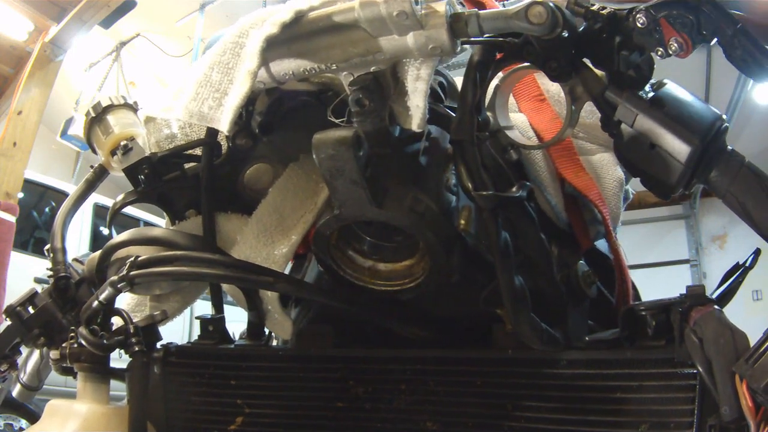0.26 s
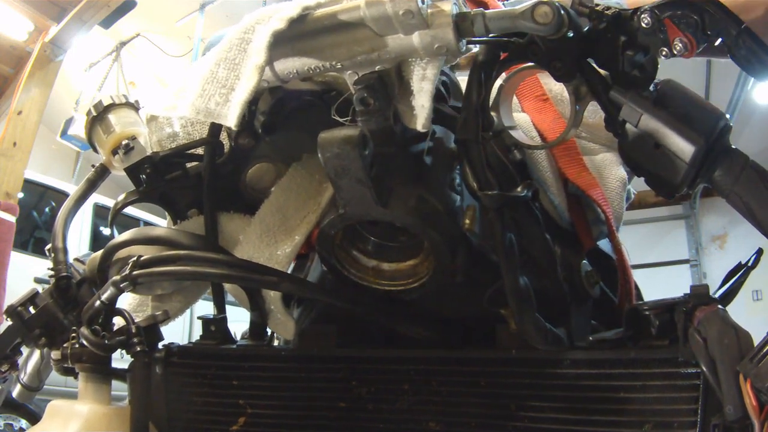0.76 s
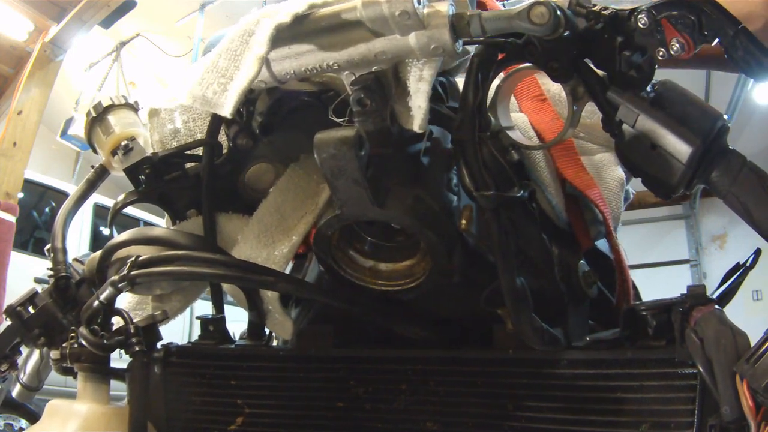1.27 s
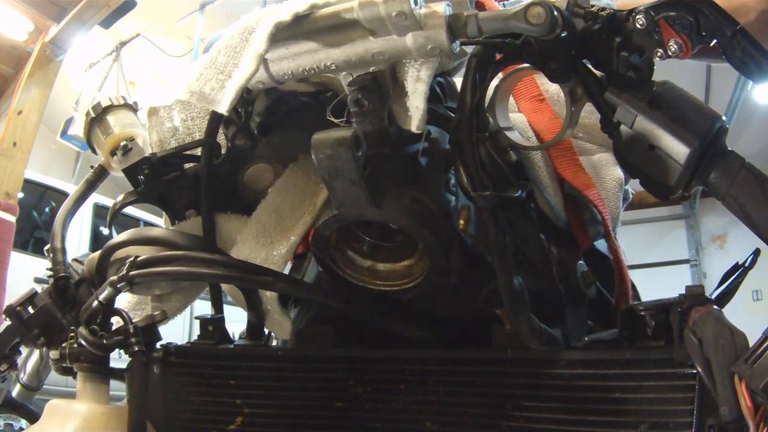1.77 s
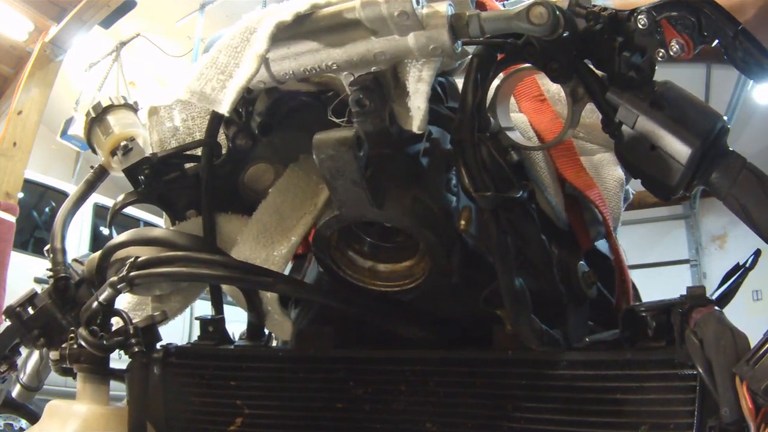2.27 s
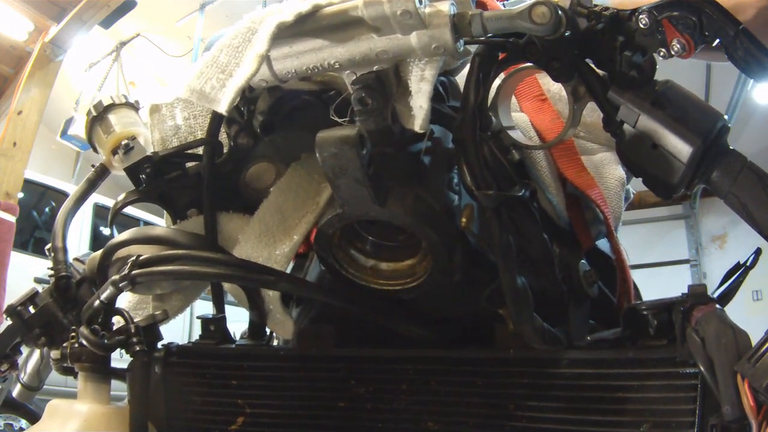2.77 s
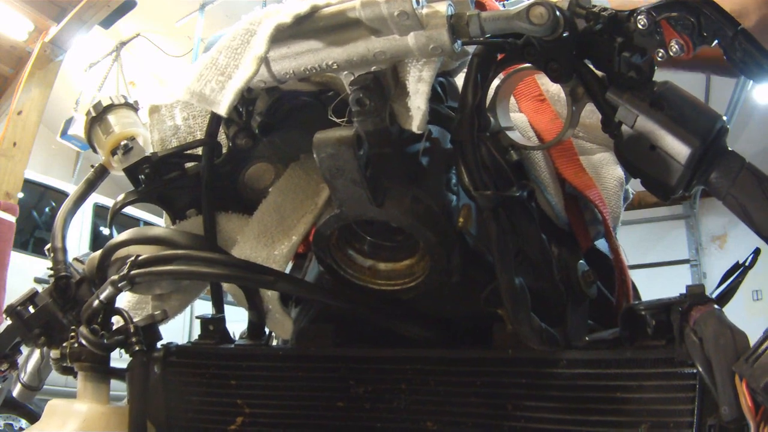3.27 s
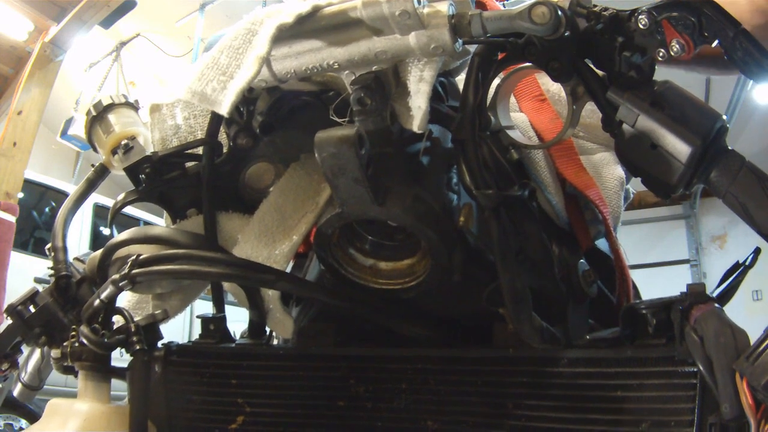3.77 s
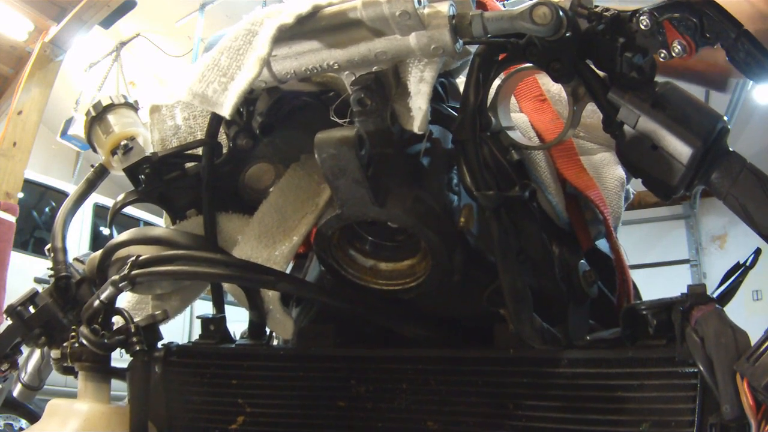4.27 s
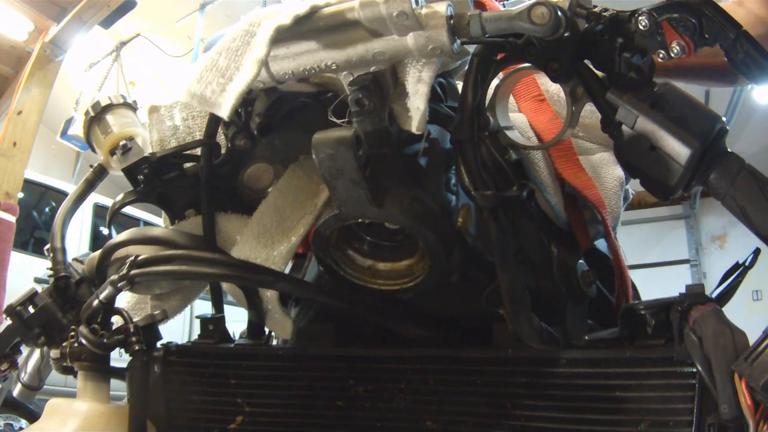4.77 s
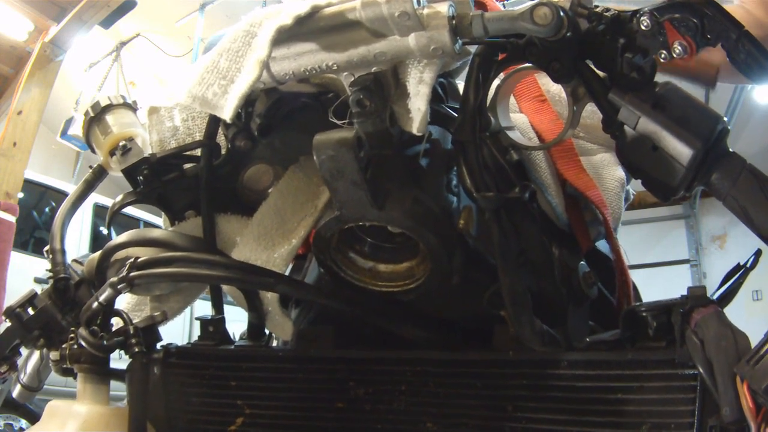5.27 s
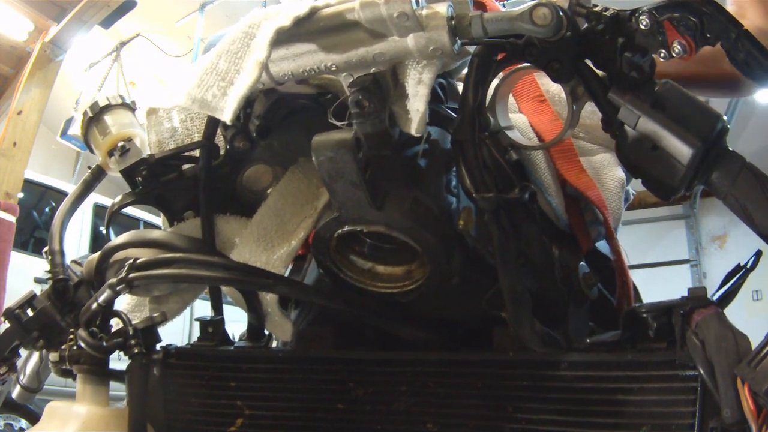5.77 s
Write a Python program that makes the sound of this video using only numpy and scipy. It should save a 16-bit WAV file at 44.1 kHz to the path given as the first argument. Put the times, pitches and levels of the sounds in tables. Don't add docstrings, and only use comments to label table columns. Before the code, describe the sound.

In a quiet garage, faint hiss and a dull stir of tools surround three soft contacts, each louder than the last. Then a hammer hits a steel punch hard, about three times a second, until the end. Every blow is a dense midrange knock with a brief bright tick, a thump as the frame rocks back and light rattle. A small close microphone lowers its level just after the first blow.

```python
import sys
import numpy as np
from scipy import signal
from scipy.fft import rfft, irfft, next_fast_len
from scipy.io import wavfile
from scipy.ndimage import map_coordinates

SR = 44100
rng = np.random.default_rng(int(sys.argv[2]) if len(sys.argv) > 2 else 0)


def convert_level_to_amplitude(level_db):
    exponent = np.asarray(level_db, float) / 20
    return 10 ** exponent


def wav_record(signal):
    frames = np.transpose(np.atleast_2d(signal))
    bounded = np.clip(frames, -1, 1)
    quanta = np.round(bounded * 32767).astype(np.int16)
    wavfile.write(sys.argv[1], SR, quanta)


N = 264820

# frequency in Hz, level in dB per Hz.
AIR = [(26, -48.5), (50, -11), (130, -7), (420, -9), (520, -12.5), (2280, -19.5), (15600, -28.5),
       (15850, -74.5)]
# frequency in Hz, level in dB per Hz.
STIR = [(120, -34.5), (250, 0.5), (450, 4.0), (1000, -9.5), (2500, -33.5)]
# frequency in Hz, level in dB per Hz.
DRIFT = [(1, 2), (4, 0), (12, -20), (30, -15), (48, -23.5), (75, -20), (110, -82.5)]
# start in seconds, peak in dB, clank in dB re peak, rise in seconds, struck part (index).
TAPS = [
    (.606, -40, -10, 0.0031, 0),
    (1.1074, -14.5, -14, 0.0033, 1.2),
    (1.9925, -8, -31, .007, 2),
]
# frequency in Hz, level in dB, t60 in seconds.
PART_MODES = [
    [(404, -5, 0.078), (513, -0.5, 0.053), (846, 2, .05), (950, 4, .05)],
    [(282, -24, 0.057), (415, 5, 0.031), (474, 0.5, 0.033), (694, -5.5, 0.053), (980, -5, 0.026),
     (1126, -9.5, 0.036), (1700, -13, 0.03), (2590, -19.5, .015), (3200, -16, 0.011)],
    [(137, -13.5, 0.07), (188.8, 4, 0.054), (227, 0.5, 0.069), (268, 2, 0.066), (318, -1.5, 0.06),
     (395, -9.5, 0.05), (544, -9.5, .04), (835, -25, 0.055), (1326, -29, .04)],
]
# frequency in Hz, level in dB per Hz.
SOFT_CLANK = [(250, -15.5), (500, 0.5), (1100, -6.5), (1700, -17.5), (2300, -27.5), (4000, -46)]
# frequency in Hz, t60 in seconds.
GARAGE_T60 = [(100, 0.65), (260, 0.35), (700, 0.39), (1800, 0.47), (5000, 0.59), (13000, 0.21)]
# frequency in Hz, level in dB.
TAIL_COLOUR = [(60, -26), (170, -8.5), (300, 2), (480, -4), (1100, 3), (3500, -14.5), (7300, -15.5),
               (15000, -19)]
# delays in seconds, then their levels in dB.
WALL_S = [.0195, .046, .0623, .1246]
WALL_DB = [-17, -21, -12, -30.5]
# frequency in Hz, level in dB.
WALL_COLOUR = [(100, 4), (600, -2.5), (1500, -9.5), (4000, -34.5), (9000, -51.5)]
# frequency in Hz, level in dB.
FAR_ECHO_COLOUR = [(200, -40), (700, -24.5), (1500, -6.5), (3600, -14), (7500, -19.5), (11000, -28.5),
                   (14000, -43)]
# start in seconds, push into the frame in dB, steel-on-steel sharpness in dB,
# grip of the race in its seat in dB, shake of loose parts in dB.
BLOWS = [(2.3771, 2, -20, 1.5, -40.5), (2.7237, -2.5, -12.5, 7.5, -41.5), (3.0542, -2, -22.5, 4, -35.5),
         (3.3997, -1.5, -23, 4.5, -36), (3.7394, -2, -17, 3, -33.5), (4.0882, -2.5, -17, 4, -35),
         (4.4295, -2.5, -21, -1.5, -34.5), (4.7788, -2.5, -16.5, 0, -33), (5.1270, -4, -14, -7, -30.5),
         (5.4815, -5.5, -12.5, -9.5, -33.5), (5.8265, -9, -15.5, -7.5, -31.5)]
# frequency in Hz, level in dB, t60 in seconds.
KNOCK_MODES = [(414.5, 5.5, 0.022), (575, -11, .03), (671, -12.5, 0.044), (810, -9, 0.044),
               (967, -8.5, 0.044), (1155, -20, 0.04), (1639, -13.5, 0.07)]
# frequency in Hz, level in dB, t60 in seconds.
ROCK_MODES = [(131.6, -23.5, 0.027), (183.7, -4, 0.048), (212, -3, 0.024), (276.2, -5.5, 0.057),
              (321.2, 7.5, 0.024), (410.2, 3.5, 0.04), (427.8, -39.5, 1.5)]
# frequency in Hz, level in dB per Hz.
CLANK = [(350, -47), (600, -1.5), (1000, -2), (1650, -9.5), (2300, -14.5), (3500, -17.5), (4600, -23.5),
         (6000, -46.5)]
# frequency in Hz, level in dB, t60 in seconds.
PUNCH_MODES = [(3600, -12, 0.0084), (4004, -10.5, 0.018), (4760, -31.5, 0.013), (5864, -9, 0.014),
               (7220, -4.5, 0.017), (7234, 6, 0.015), (7500, -18.5, .016), (8100, -3.5, 0.014),
               (8900, -9, 0.012), (9640, -1, 0.018), (12400, -13, 0.0043), (13700, -6.5, .01),
               (14900, -6.5, .01)]
# frequency in Hz, level in dB per Hz.
CRACK = [(1000, -9), (3000, 3.5), (12000, 3.0), (16000, -10.0)]
# frequency in Hz, level in dB per Hz.
LOOSE = [(1000, 0.5), (1650, -9), (2400, -14), (3300, -15.5), (4600, -21.5), (6000, -15), (15000, -25),
         (16000, -63)]
# centres in Hz, then width, lift and its scatter from blow to blow.
LOOSE_BANDS_HZ, BAND_WIDTH_HZ, BAND_DB, BAND_SCATTER_DB = [1650, 3250, 5850, 7400, 9300, 10200], 330, 7, 2

STIR_DB, STIR_SWELL_DB, STIR_SPAN_S = -67, 3.5, 0.091
WHINE_HZ, WHINE_DB, DRIFT_DB = 5120, -85.5, -55
FAR_ECHO_S, TAIL_DB = 0.0602, -4.0
SHIFTING = 0.52
CONTACT_S = 0.0003
SEAT_HZ, SEAT_WIDTH_HZ = 464, 63
FREED_HZ, FREED_SHARE = 965, 0.67
FRAME_DB, ROCK_DB, ROCK_LAG_S = -2.0, 1, 0.00827
CLANK_DB, CLANK_FOLLOWS = -11.5, 1
CRACK_DB, CRACK_FOLLOWS = -13, 0.54
MIC_LOW_HZ, MIC_HIGH_HZ = 137.3, 12700
GAIN_DROP_DB, GAIN_LAG_S, GAIN_ATTACK_S = -7.5, 0.007, 0.0028
OVERLOAD, KNEE = 0.9, 5


def unit(x):
    return x / np.sqrt(np.mean(x ** 2) + 1e-20)


def along(points, hz):
    f, v = np.transpose(points)
    return np.interp(np.log(hz + 0.1), np.log(f + 0.1), v)


def coloured(x, spectrum):
    m = next_fast_len(len(x) + 8192)
    gain = convert_level_to_amplitude(along(spectrum, np.fft.rfftfreq(m, 1 / SR)))
    return irfft(rfft(x, m) * gain, m)[:len(x)]


def stir():
    t = np.arange(N) / SR
    lumps = convert_level_to_amplitude(3 * map_coordinates(rng.standard_normal(200), [t * 30]))
    busy = sum(np.exp(-((t - tap[0]) / STIR_SPAN_S) ** 2) for tap in TAPS)
    rustle = unit(lumps * coloured(rng.standard_normal(N), STIR))
    return convert_level_to_amplitude(STIR_DB + STIR_SWELL_DB * busy) * rustle


def background():
    air = convert_level_to_amplitude(-61.5) * unit(coloured(rng.standard_normal(N), AIR))
    hum = convert_level_to_amplitude(-68.5) * np.sin(2 * np.pi * 120 * np.arange(N) / SR)
    return air + hum + stir()


def camera_noise():
    whine = convert_level_to_amplitude(WHINE_DB) * np.sin(2 * np.pi * WHINE_HZ * np.arange(N) / SR)
    drift = convert_level_to_amplitude(DRIFT_DB) * unit(coloured(rng.standard_normal(N), DRIFT))
    return whine + drift


def ringing(modes, t, rise):
    t = np.clip(t, 0, None)
    hz, db, t60 = np.transpose(modes)[:, :, None]
    high = hz > 600
    t60 = np.minimum(t60, np.where(hz > 520, 0.026, 2))
    db = db + np.where(high, 1.8, 0.8) * rng.standard_normal(hz.shape)
    hz = hz * (1 + np.where(high, 0.012, 0.004) * rng.standard_normal(hz.shape))
    tones = convert_level_to_amplitude(db - 60 * t / t60) * np.sin(2 * np.pi * hz * t)
    return tones.sum(0) * (1 - np.exp(-t / rise))


def burst(spectrum, t, t60, rise):
    noise = unit(coloured(rng.standard_normal(len(t)), spectrum))
    return noise * convert_level_to_amplitude(-60 * t / t60) * (1 - np.exp(-t / rise))


def taps():
    out, t = np.zeros(N + SR), np.arange(SR // 2) / SR
    for s, db, clank_db, rise, part in TAPS:
        ring = ringing(PART_MODES[int(part)], t, rise)
        clank = convert_level_to_amplitude(clank_db) * burst(SOFT_CLANK, t, 0.12, 0.0062)
        out[round(s * SR):][:len(t)] += convert_level_to_amplitude(db) * (ring + clank)
    return out[:N]


def delayed(x, s):
    return np.pad(x, (round(s * SR), 0))[:N]


def decay():
    hz, t, z = signal.stft(rng.standard_normal(SR // 2 + 4096), SR, nperseg=256)
    fade = convert_level_to_amplitude(-60 * t / along(GARAGE_T60, hz)[:, None])
    tail = signal.istft(z * fade, SR, nperseg=256)[1]
    build_up = 1 - np.exp(-np.arange(len(tail)) / SR / 0.015)
    return tail / np.linalg.norm(tail) * build_up


def garage(x):
    starts = [round(row[0] * SR) for row in [*TAPS, *BLOWS]] + [N]
    lasting, diffuse = decay(), np.zeros(N + SR)
    for a, b in zip(starts, starts[1:]):
        room = np.sqrt(1 - SHIFTING) * lasting + np.sqrt(SHIFTING) * decay()
        answer = signal.fftconvolve(x[a:b], room)
        diffuse[a:][:len(answer)] += answer
    tail = convert_level_to_amplitude(TAIL_DB) * coloured(diffuse[:N], TAIL_COLOUR)
    echoes = sum(convert_level_to_amplitude(db) * delayed(x, s) for s, db in zip(WALL_S, WALL_DB))
    far_echo = coloured(delayed(x, FAR_ECHO_S), FAR_ECHO_COLOUR)
    return tail + coloured(echoes, WALL_COLOUR) + far_echo


def seated(modes, grip_db):
    def near(hz, centre_hz):
        return np.exp(-((hz - centre_hz) / SEAT_WIDTH_HZ) ** 2)

    def lift(hz):
        return grip_db * (near(hz, SEAT_HZ) - FREED_SHARE * near(hz, FREED_HZ))

    return [(hz, db + lift(hz), t60) for hz, db, t60 in modes]


def frame_knock(t, push_db, grip_db):
    knock = ringing(seated(KNOCK_MODES, grip_db), t, 0.0011)
    rocking = ringing(seated(ROCK_MODES, grip_db), t - ROCK_LAG_S, 0.0014)
    clank = convert_level_to_amplitude(CLANK_DB + CLANK_FOLLOWS * push_db) * burst(CLANK, t, 0.075, 0.00067)
    frame = convert_level_to_amplitude(push_db) * (knock + convert_level_to_amplitude(ROCK_DB) * rocking) + clank
    push = np.hanning(3 + int(CONTACT_S * SR))
    return signal.fftconvolve(frame, push / push.sum())[:len(t)]


def punch_ring(t, sharp_db):
    ring = convert_level_to_amplitude(sharp_db) * ringing(PUNCH_MODES, t, 0.0012)
    crack = convert_level_to_amplitude(CRACK_DB + CRACK_FOLLOWS * sharp_db) * burst(CRACK, t, 0.033, 0.0006)
    return ring + crack


def rattle(t):
    hz = np.geomspace(900, 16000, 90)
    bands = np.exp(-((hz - np.c_[LOOSE_BANDS_HZ]) / BAND_WIDTH_HZ) ** 2)
    band_db = BAND_DB + BAND_SCATTER_DB * rng.standard_normal(len(LOOSE_BANDS_HZ))
    return burst(np.c_[hz, along(LOOSE, hz) + band_db @ bands], t, 0.4, 0.00043)


def blows():
    out, t = np.zeros(N + SR), np.arange(SR // 2) / SR
    for s, push_db, sharp_db, grip_db, rattle_db in BLOWS:
        hit = convert_level_to_amplitude(FRAME_DB) * frame_knock(t, push_db, grip_db)
        hit = hit + punch_ring(t, sharp_db) + convert_level_to_amplitude(rattle_db) * rattle(t)
        out[round(s * SR):][:len(t)] += hit
    return out[:N]


def microphone(x):
    low_cut = signal.butter(6, MIC_LOW_HZ, "high", fs=SR, output="sos")
    high_cut = signal.butter(2, MIC_HIGH_HZ, fs=SR, output="sos")
    return signal.sosfilt(np.vstack([low_cut, high_cut]), x)


def scene():
    hits = blows() + taps()
    return (microphone(hits + garage(hits)) + background())[None]


def gain_control(x):
    since_blow = np.arange(N) / SR - BLOWS[0][0]
    return x * convert_level_to_amplitude(GAIN_DROP_DB * np.clip((since_blow - GAIN_LAG_S) / GAIN_ATTACK_S, 0, 1))


def overload(x):
    return x / (1 + np.abs(x / OVERLOAD) ** KNEE) ** (1 / KNEE)


def top_cut(x):
    return signal.sosfilt(signal.butter(12, 16570, fs=SR, output="sos"), x)


def record(dry):
    mix = overload(gain_control(dry)) + camera_noise()
    return top_cut(mix)


dry = scene()
out = record(dry)
wav_record(out)
```